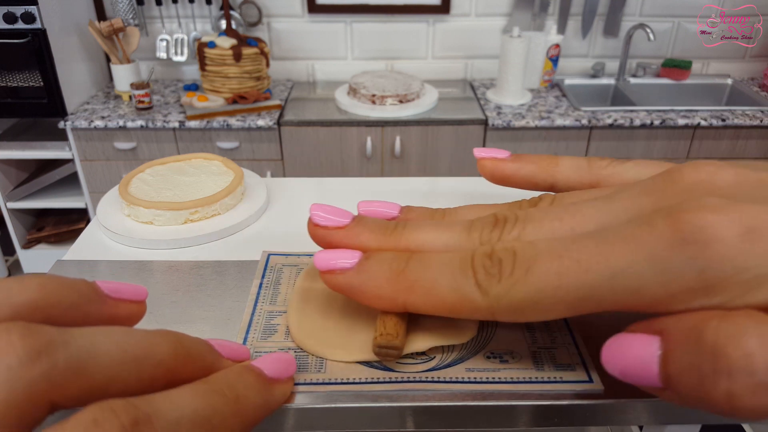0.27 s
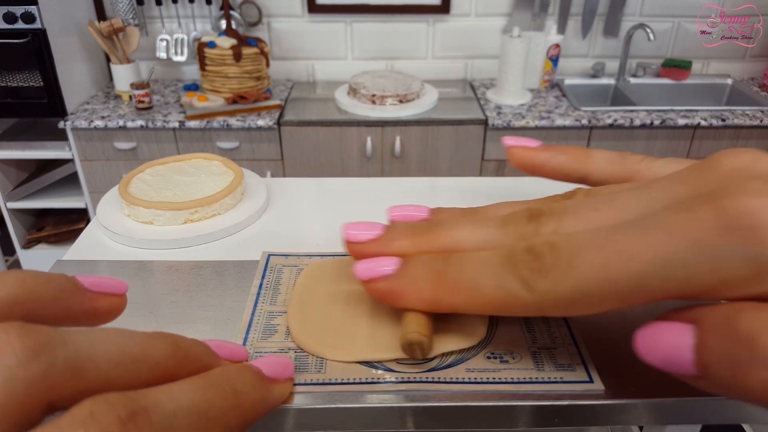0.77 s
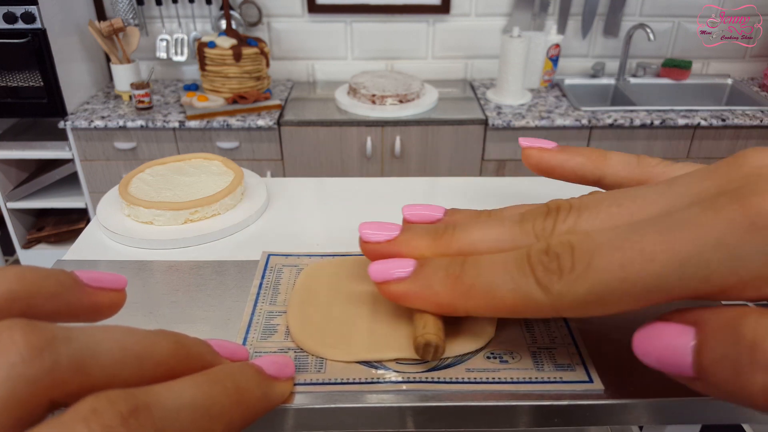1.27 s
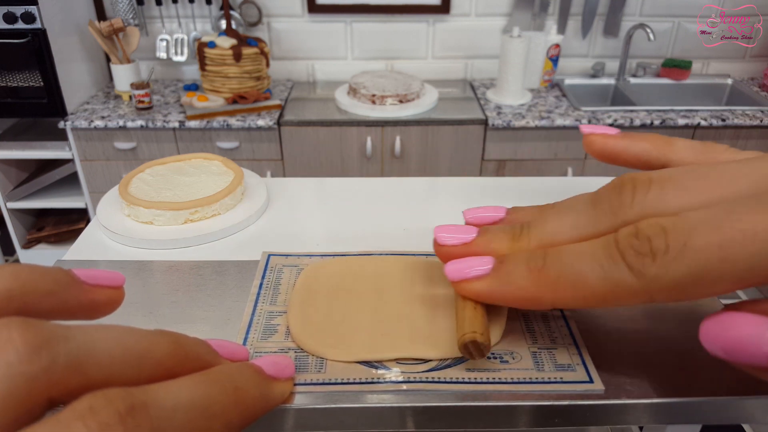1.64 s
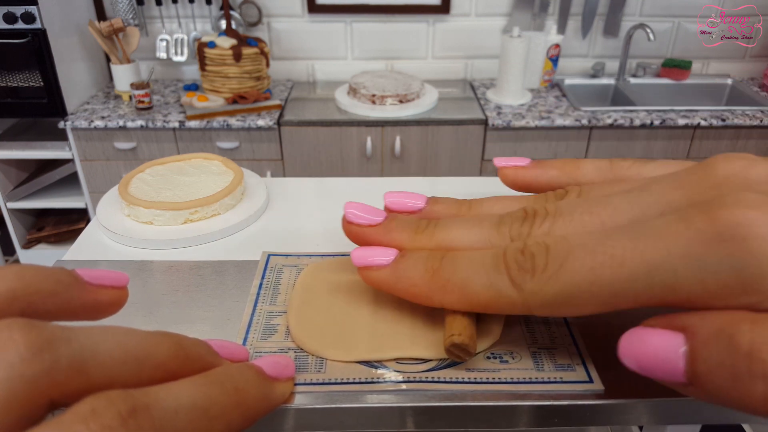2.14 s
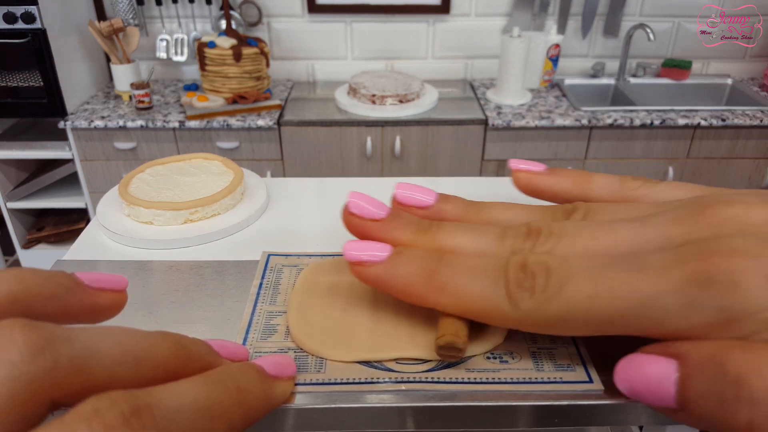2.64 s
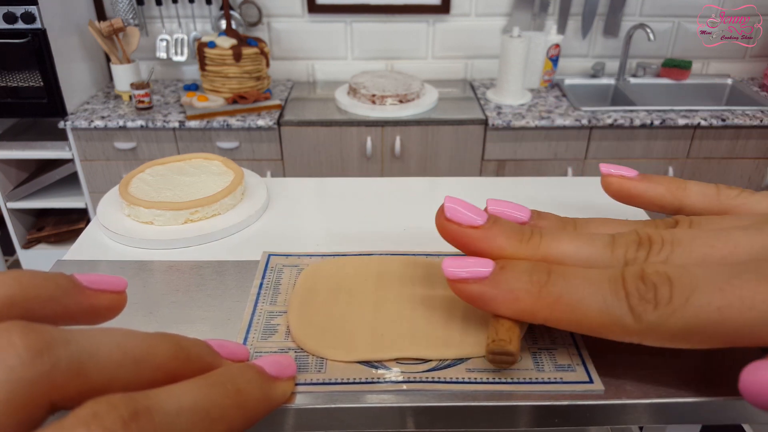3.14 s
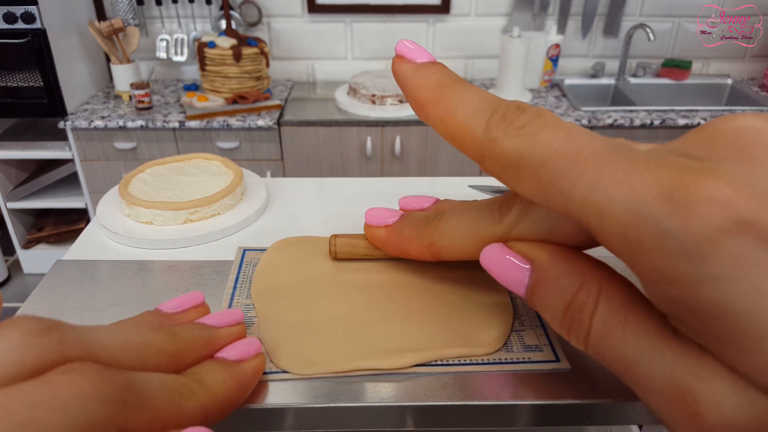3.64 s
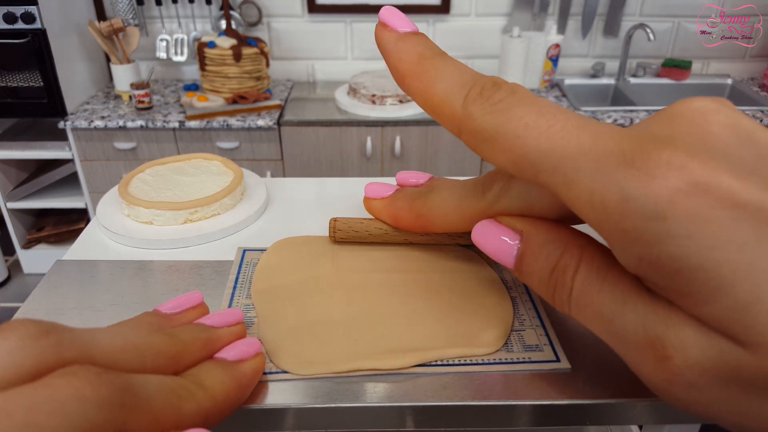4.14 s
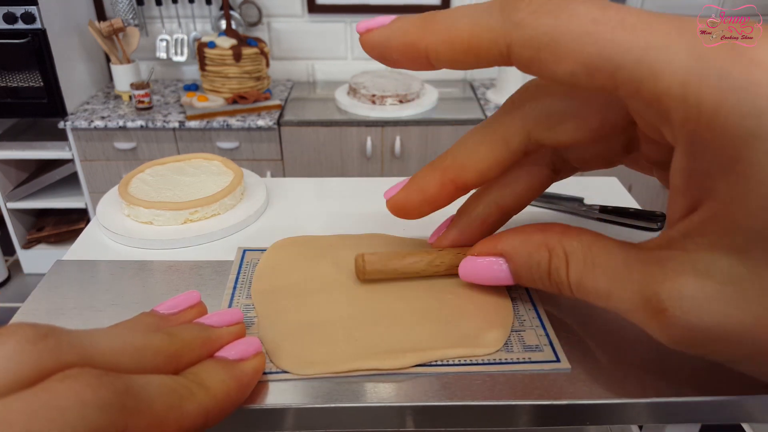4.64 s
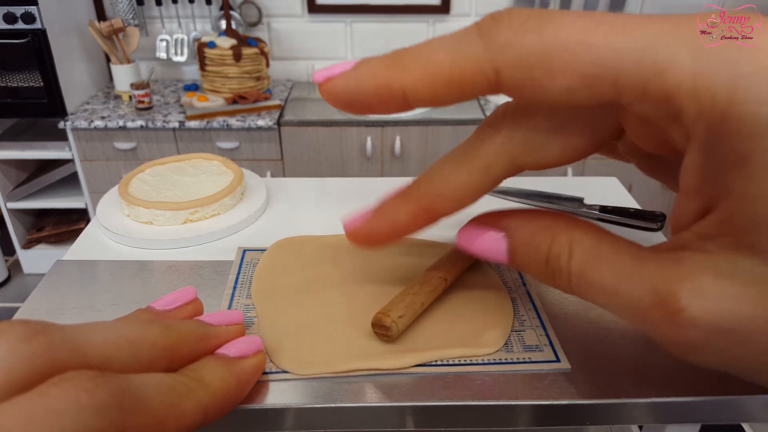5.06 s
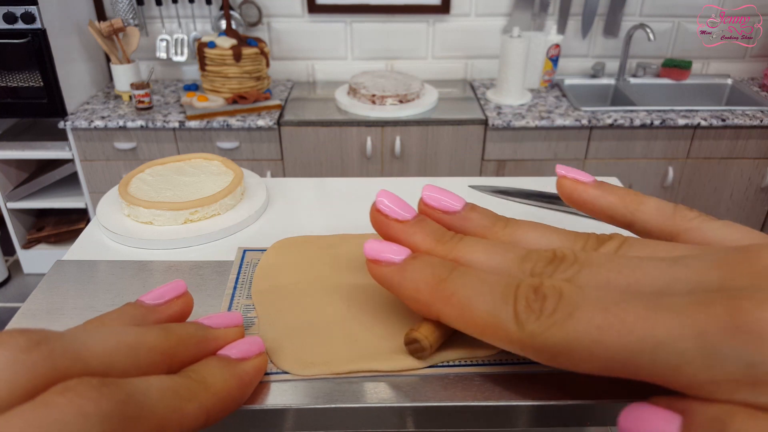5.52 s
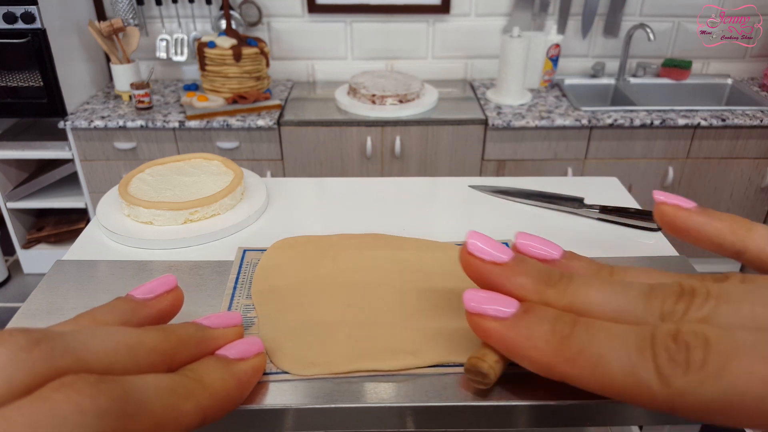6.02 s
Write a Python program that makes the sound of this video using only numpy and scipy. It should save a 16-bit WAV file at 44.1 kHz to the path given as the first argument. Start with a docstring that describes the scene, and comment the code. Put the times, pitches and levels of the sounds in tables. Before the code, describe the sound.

A tiny wooden rolling pin rolls over dough on a counter, with light irregular clicks, taps and soft thuds, close up.

```python
"""Light wooden ticks and knocks, close up: a tiny rolling pin is pushed over dough on a mat.
Pin and fingernails strike a small steel-topped counter; the table under it thuds and rumbles as the
hand presses, and the dough crackles faintly. A finger slides, the pin is set down with a thin squeak.
A small room answers over faint hiss and hum, all heard by one mono microphone."""
import sys
import numpy as np
from scipy import signal
from scipy.fft import rfft, irfft, next_fast_len
from scipy.io import wavfile

SR = 44100
rng = np.random.default_rng(int(sys.argv[2]) if len(sys.argv) > 2 else 0)


def store_wav(level_fs):
    """Save 16-bit WAV to argv[1]."""
    pcm = np.round(np.clip(np.atleast_2d(level_fs), -1, 1) * 32767)
    wavfile.write(sys.argv[1], SR, pcm.T.astype(np.int16))


N = 277161

USUAL_KNOCK_DB = -46.5  # thud and grit follow how far a knock is above or below this
# pin and nails strike the counter:
# (time [s], knock level [dB], click level [dB], click pitch [Hz], snap level [dB])
TAPS = [(0.14, -56.5, -68, 2250, -67), (0.289, -59, -48.5, 2330, -80), (0.355, -55.5, -57, 2100, -84),
        (0.492, -54.5, -66, 2140, -85), (0.596, -53, -61, 2390, -69), (0.607, -50.5, -61, 2120, -82),
        (0.616, -47.5, -50, 2040, -67), (0.629, -46, -43, 2040, -59), (0.658, -39, -45, 2030, -60),
        (0.782, -44, -46.5, 2000, -75), (0.807, -53, -64, 1880, -82), (0.812, -50.5, -59, 1890, -80),
        (0.903, -54.5, -71, 2180, -85), (0.923, -52.5, -82, 2280, -84), (1.074, -46.5, -60, 2000, -81),
        (1.09, -38.5, -55, 1980, -80), (1.207, -53, -77, 2700, -80), (1.36, -43.5, -75, 2140, -76),
        (1.369, -50, -59, 1900, -77), (1.648, -60, -89, 2650, -82), (1.821, -60, -82, 2450, -70),
        (1.952, -63.5, -80, 2380, -83), (2.609, -38, -52.5, 2440, -58), (2.755, -57.5, -69, 2550, -65),
        (2.8907, -26, -32.5, 2610, -49.5), (3.05, -48, -52.5, 2400, -67), (3.059, -50.5, -56.5, 2270, -69),
        (3.175, -52.5, -68, 2540, -70), (3.216, -54, -66, 2370, -76), (3.284, -41, -56.5, 2560, -52),
        (3.682, -51, -56.5, 2050, -80), (3.8, -66, -61.5, 2310, -64), (5.104, -38.5, -59, 2610, -49),
        (5.11, -31, -48, 2250, -48), (5.606, -47.5, -66, 2440, -80), (5.709, -52.5, -58, 2420, -80),
        (5.738, -54, -65, 2740, -68), (5.787, -43, -60, 2340, -75), (5.828, -34.5, -49, 1850, -76),
        (5.861, -52, -66, 2390, -83), (5.88, -46, -73, 2180, -77), (5.926, -50, -64, 2200, -76),
        (5.9949, -46, -44.5, 2630, -72), (6.006, -59, -52, 2150, -72), (6.022, -51, -81, 2150, -84),
        (6.038, -45, -62, 2130, -78), (6.078, -46, -48.5, 3100, -52), (6.12, -36.5, -42.5, 2700, -61),
        (6.163, -52, -68, 2170, -67), (6.208, -55.5, -62.5, 2070, -66), (6.242, -56.5, -90, 2370, -82)]
def taps():
    """Pin and nails tick and knock, each with its own answer from the room."""
    out, t = np.zeros(N + SR), np.arange(SR // 3) / SR
    for s, *contact in TAPS:
        out[round(s * SR):][:len(t)] += room(blow(t, *contact), wet_db=-14.5, build_s=0.0018)
    return out[:N]


def blow(t, knock_db, click_db, click_hz, snap_db):
    """One contact in four layers: counter knock, table thud, pin click and surface snap."""
    hardness = min(10 + click_db - knock_db, 10)  # bare wood is bright, dough dulls click and knock
    thud_db = -63 + 0.91 * (knock_db - USUAL_KNOCK_DB)
    sharpness = np.clip(snap_db - click_db + 5.5, -2.5, 6)
    return (amp(knock_db) * knock(t, hardness) + amp(thud_db) * thud(t)
            + amp(click_db) * click(t, click_hz) + amp(snap_db) * snap(t, sharpness))


# modes of the steel-topped counter: (frequency [Hz], level [dB], t60 [s])
COUNTER = [(464, -15, 0.0042), (491, -9, 0.013), (593, -5.5, 0.012), (663, 1.5, 0.027), (677, -12, 0.014),
           (765, -18, 0.075), (939, 0, 0.013), (1006, -7.5, 0.0082), (1316, -12, 0.026),
           (1433, -24.5, 0.054)]
def knock(t, tilt_db):
    """The counter rings briefly; a harder contact tilts its modes brighter, in dB per octave."""
    panel = ring(COUNTER, t, tilt_db, scatter_db=1.5, detune=.012)
    attack = 1 - np.exp(-t / 0.0012)
    return struck(radiated(panel * attack, corner_hz=422), span_s=0.011)


def through_counter(x):
    """A rubbing force heard through the counter's modes, rms 1."""
    t = np.arange(SR // 8) / SR
    return unit(signal.fftconvolve(x, ring(COUNTER, t, 0, scatter_db=4, detune=0))[:N])


# modes of the wooden pin: (frequency [Hz], level [dB], t60 [s])
PIN = [(1710, 9.5, 0.0054), (1870, 10, 0.049), (2080, 11, 0.034), (2408, 4.5, 0.038), (2700, -24, 0.026),
       (2920, -69, 0.0039), (3340, 11, 0.022)]
# noise colour of the pin's impact: (frequency [Hz], level [dB])
CRACK = [(400, -14), (1000, 1.5), (1400, 6.5), (2000, 4.5), (2700, 8), (3400, -15), (4000, -23),
         (5500, -19.5), (10000, -40)]
def click(t, click_hz):
    """The pin clicks: a dry crack over a short wooden ring."""
    tilt_db = 24 * np.log2(click_hz / PIN[3][0])  # a shorter contact favours the higher modes
    wood = unit(ring(favoured(PIN, click_hz), t, tilt_db, scatter_db=2, detune=.02))
    burst = amp(-60 * t / 0.0077) + 0.27 * amp(-60 * t / 0.051)  # impact, then scatter off nearby surfaces
    colour = tilted(favoured(CRACK, click_hz), 1.93 * tilt_db)
    crack = unit(noise(colour, len(t)) * burst)
    return struck(cushioned(0.48 * wood + crack, corner_hz=4120), span_s=0.011)


# noise colour of hard surfaces meeting: (frequency [Hz], level [dB])
SNAP = [(1500, -1.5), (3900, 4), (5500, -8.5), (9000, -11.5), (15000, -31)]
def snap(t, sharpness):
    """The bright edge of a tap; a small hard contact, as of a nail, reaches higher."""
    rasp = noise(tilted(SNAP, 0.39 * sharpness), len(t)) * amp(-60 * t / 0.03)
    attack = 1 - np.exp(-t / 0.00013)
    return struck(rasp * attack, span_s=0.004)


# modes of the table: (frequency [Hz], level [dB], t60 [s])
TABLE = [(139.3, -10.5, 0.49), (170.4, -7, 0.46), (197, 7.5, 0.2), (219.6, -0.5, 0.23), (240.4, -3.5, 0.25),
         (270.4, 0, 0.098), (327, -14.5, 0.35)]
def thud(t):
    """The table under the counter answers lower and more slowly."""
    table = ring(TABLE, t, 0, scatter_db=3, detune=.015)
    attack = 1 - np.exp(-t / 0.0025)
    return struck(radiated(table * attack, corner_hz=121), span_s=0.018)


# the table's rocking modes: (frequency [Hz], level [dB], t60 [s])
ROCKING = [(61.3, 0.5, 0.25), (126, -12, 0.14), (214, -6, 0.14)]
# rumble colour of the swaying table: (frequency [Hz], level [dB])
SWAY = [(22, -16), (42, -15), (58, 7), (78, -9), (105, -19), (135, -12), (170, -14), (195, -8),
        (250, -10.5), (500, -45)]
# the hand bears down on the pin: (time [s], rocking level [dB], thud level [dB], bump level [dB])
PRESSES = [(0.127, -53.5, -82, -68), (.289, -63, -45.5, -43.5), (.628, -54, -60, -69),
           (1.074, -56, -59.5, -57), (2.223, -48, -70, -63.5), (2.283, -55, -48.5, -48),
           (2.406, -61, -48, -61), (2.609, -80, -50, -86), (2.747, -75, -51.5, -62),
           (3.682, -79, -60.5, -81), (5.109, -69, -45.5, -80)]
def presses():
    """Each push bumps the counter through the dough, rocks the table and leaves it swaying."""
    out, t = np.zeros(N + SR), np.arange(SR // 2) / SR
    for s, rock_db, thud_db, bump_db in PRESSES:
        rock = ring(ROCKING, t, 0, scatter_db=0.5, detune=0.049) * (1 - np.exp(-t / 0.0064))
        bump = cushioned(knock(t, tilt_db=-59), corner_hz=960)  # muffled by the dough
        push = amp(thud_db) * thud(t) + amp(bump_db) * bump
        out[round(s * SR):][:len(t)] += amp(rock_db) * rock + room(push, wet_db=-10.5, build_s=0.002)
    hold_s, resting_db = 0.052, -72.5
    swings = [(s, hold_s, rock_db - 12) for s, rock_db, *_ in PRESSES]
    sway = amp(resting_db) + strokes(swings, attack_s=.02, release_s=0.74)
    return out[:N] + sway * noise(SWAY, N)


# colour of dry friction: (frequency [Hz], level [dB])
SCUFF_HISS = [(400, -5.5), (1000, -13.5), (1500, -7), (2500, -2.5), (3100, -10), (3500, -11.5), (4000, -18),
              (9000, -23), (15000, -38)]
# strokes of the pin over the dough: (start [s], length [s], level [dB])
ROLLS = [(0.02, 1.83, -65.5), (2.65, 0.62, -60), (5.22, 0.6, -63), (5.75, .45, -71)]
def rolling():
    """Dough and mat crackle faintly under the pin, and rub grittily as it rides over each bump."""
    slips = grains(per_s=260, spread_db=1.5)
    crackle = 0.29 * through_counter(slips) + 0.25 * coloured(slips, SCUFF_HISS)
    fine_slips = grains(per_s=1500, spread_db=2)
    grit = through_counter(fine_slips) + 0.38 * coloured(fine_slips, SCUFF_HISS)
    lead_s, hold_s = 0.021, 0.03  # the grit starts just ahead of each knock
    bumps = [(s - lead_s, hold_s, -66 + 0.33 * (knock_db - USUAL_KNOCK_DB)) for s, knock_db, *_ in TAPS]
    friction = (strokes(ROLLS, attack_s=0.067, release_s=0.35) * crackle
                + strokes(bumps, attack_s=0.028, release_s=0.073) * grit)
    return room(friction, wet_db=-15.0, build_s=0.0064)


# fingers scuff the pin: (start [s], length [s], level [dB])
SCUFFS = [(4.001, 0.0072, -59.5), (4.021, 0.0073, -57), (4.17, .03, -68.5), (4.205, 0.013, -63),
          (4.283, 0.014, -58), (4.31, 0.048, -71)]
def scuffing():
    """Fingers brush the pin in short, dry bursts of tiny slips."""
    scuff = coloured(grains(per_s=2200, spread_db=0.5), SCUFF_HISS)
    return strokes(SCUFFS, attack_s=0.0023, release_s=0.043) * scuff


# resonances of the rubbed finger and pin: (frequency [Hz], width [Hz], level [dB])
RUB = [(663, 220, 6), (1380, 700, -6.5), (2070, 450, -1), (2660, 310, -5.5), (3530, 420, -5.5),
       (5700, 1100, -18), (8400, 1000, -18)]
# hiss colour of the slide: (frequency [Hz], level [dB])
SLIDE_HISS = [(300, 4), (1000, 6), (4000, -3), (8000, -9), (12000, -12), (15000, -20)]
# jerks of the sliding finger: (start [s], length [s], level [dB])
SLIDES = [(4.642, 0.067, -57.5), (4.716, 0.026, -56), (4.765, 0.022, -55.5), (4.81, .055, -69.5)]
def sliding():
    """A finger slides along the pin in jerks, with a resonant rasp and a soft hiss."""
    def body(hz):
        return sum(amp(db) * (1j * hz * width / (centre ** 2 - hz ** 2 + 1j * hz * width)) ** 2
                   for centre, width, db in RUB)
    rasp = unit(filtered(grains(per_s=4000, spread_db=5.0), body))
    return strokes(SLIDES, attack_s=0.01, release_s=0.11) * (rasp + 0.46 * noise(SLIDE_HISS, N))


# the pin is set down: (start [s], length [s], level [dB])
SQUEAKS = [(5.084, 0.021, -62.5)]
def squeaking():
    """The pin gives one thin squeak, a narrow band of high noise."""
    squeak = noise([(6000, -54), (8200, -15), (8750, 2), (9200, -14), (11000, -59)], N)
    return strokes(SQUEAKS, attack_s=0.0057, release_s=.03) * squeak


# decay of the small room: (frequency [Hz], t60 [s])
ROOM = [(150, 0.3), (700, 0.26), (2500, 0.26), (9000, 0.1)]
def room(x, wet_db, build_s):
    """Adds a diffuse tail that swells in, then dies at its own speed at each frequency."""
    hz, t, spectrum = signal.stft(rng.standard_normal(SR // 3), SR, nperseg=256)
    decay = amp(-60 * t / along(ROOM, hz)[:, None])
    tail = signal.istft(spectrum * decay, SR, nperseg=256)[1]
    tail *= 1 - np.exp(-(np.arange(len(tail)) / SR / build_s) ** 2)
    return x + amp(wet_db) * signal.fftconvolve(x, tail / np.linalg.norm(tail))[:len(x)]


# colour of the noise floor: (frequency [Hz], level [dB])
HISS = [(26, -15), (45, -5), (157, 0.5), (276, -6), (440, -7.5), (522, -8.5), (684, -8.5), (873, -10.5),
        (1170, -11.5), (1290, -10), (1430, -12), (1780, -12), (3800, -16.5), (14600, -25), (15800, -26.5)]
# steady hum and whine tones: (frequency [Hz], level [dB])
HUM = [(59, -97.5), (191, -81), (4300, -101), (8793, -96)]
def background():
    """Steady room noise and microphone hiss, with a low hum and a faint electric whine."""
    t = np.arange(N) / SR
    tones = sum(amp(db) * np.sqrt(2) * np.sin(2 * np.pi * (hz * t + rng.random())) for hz, db in HUM)
    return amp(-65.5) * noise(HISS, N) + tones


def ring(modes, t, tilt_db, scatter_db, detune):
    """Damped modes; strength and pitch vary with where the blow lands and how the hand loads them."""
    hz, db, t60 = np.transpose(modes)[:, :, None]
    size, shift = rng.standard_normal((2, len(modes), 1))
    gain = amp(db + tilt_db * np.log2(hz / hz[0]) + scatter_db * size - 60 * t / t60)
    return np.sum(gain * np.sin(2 * np.pi * hz * (1 + detune * shift) * t), axis=0)


def struck(x, span_s):
    """Scale a blow so that its energy equals rms 1 held for span_s."""
    return x / np.sqrt(np.sum(x ** 2) / (span_s * SR))


def radiated(x, corner_hz):
    """A small panel radiates little below its corner frequency."""
    return signal.sosfilt(signal.butter(2, corner_hz, "high", fs=SR, output="sos"), x)


def cushioned(x, corner_hz):
    """A yielding contact rounds off the top of a blow."""
    return signal.sosfilt(signal.butter(4, corner_hz, fs=SR, output="sos"), x)


def favoured(rows, click_hz):
    """The length of a contact favours the frequencies around one pitch."""
    return [(hz, db - min(11 * np.log2(hz / click_hz) ** 2, 5), *rest) for hz, db, *rest in rows]


def tilted(spectrum, slope_db):
    """A spectrum with a slope in dB per octave added."""
    return [(hz, db + slope_db * np.log2(hz / spectrum[0][0])) for hz, db in spectrum]


def strokes(rows, attack_s, release_s):
    """Envelope of gestures: each rises, holds, then dies by 60 dB in release_s."""
    t = np.arange(N) / SR
    return sum(np.clip((t - s) / attack_s, 0, 1)
               * amp(db - 60 * np.maximum(t - s - length, 0) / release_s) for s, length, db in rows)


def grains(per_s, spread_db):
    """Tiny slips at random moments and of random sizes."""
    return (rng.random(N) < per_s / SR) * rng.standard_normal(N) * amp(spread_db * rng.standard_normal(N))


def noise(spectrum, count):
    """Coloured noise of rms 1."""
    return coloured(rng.standard_normal(count), spectrum)


def coloured(x, spectrum):
    """x through an EQ curve, at rms 1."""
    return unit(filtered(x, lambda hz: amp(along(spectrum, hz))))


def filtered(x, response):
    """x through a frequency response."""
    size = next_fast_len(len(x) + SR // 4)
    return irfft(rfft(x, size) * response(np.fft.rfftfreq(size, 1 / SR)), size)[:len(x)]


def along(points, hz):
    """Read a curve on a log frequency axis."""
    point_hz, values = np.transpose(points)
    return np.interp(np.log(hz + 1), np.log(point_hz + 1), values)


def amp(db):
    """Decibels to gain."""
    return 10 ** (np.asarray(db) / 20)


def unit(x):
    """Scale to rms 1."""
    return x / np.sqrt(np.mean(x ** 2) + 1e-20)


def scene():
    """Everything at the one microphone."""
    pin = taps() + presses() + rolling()
    handling = room(scuffing() + sliding() + squeaking(), wet_db=-11, build_s=0.0048)
    return (pin + handling + background())[None]


def record(dry):
    """The recorder sits slightly off zero and keeps nothing above its band limit."""
    top_hz, offset = 15800, -.0007
    return np.array([filtered(x, lambda hz: hz < top_hz) for x in dry]) + offset


dry = scene()
out = record(dry)
store_wav(out)
```